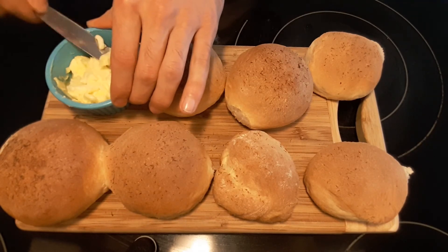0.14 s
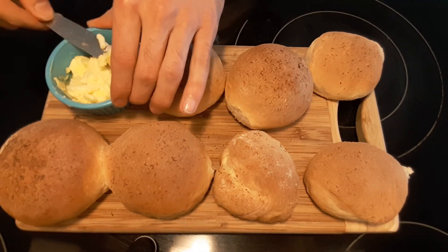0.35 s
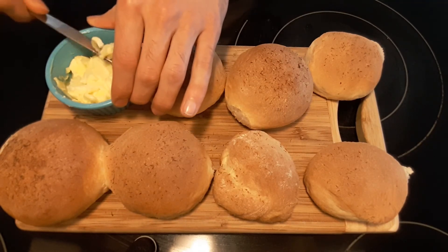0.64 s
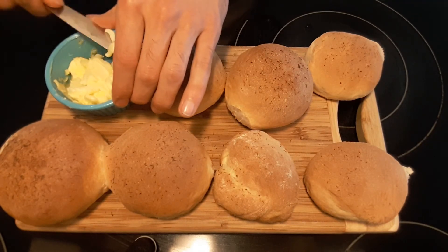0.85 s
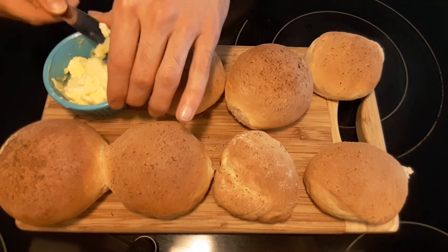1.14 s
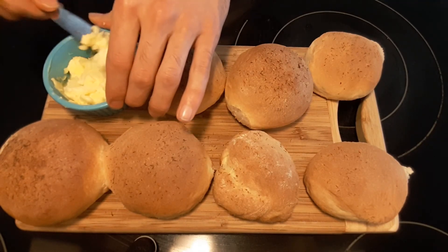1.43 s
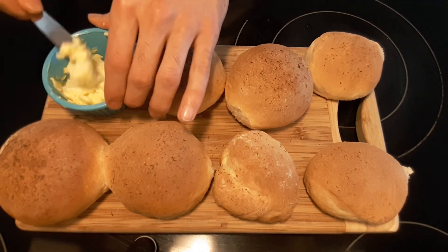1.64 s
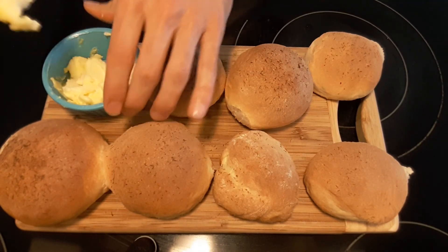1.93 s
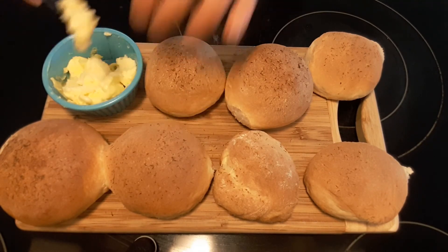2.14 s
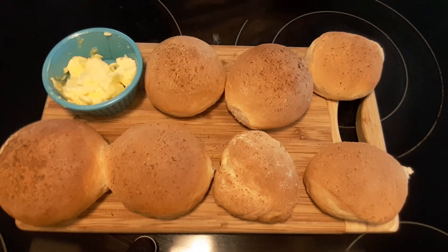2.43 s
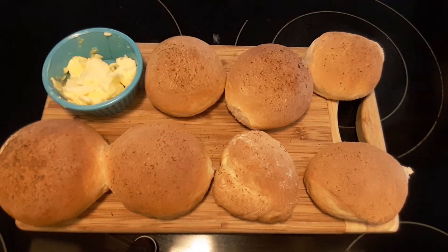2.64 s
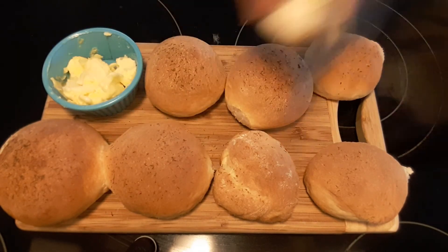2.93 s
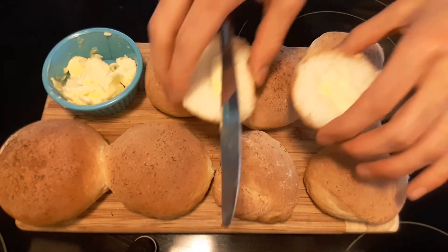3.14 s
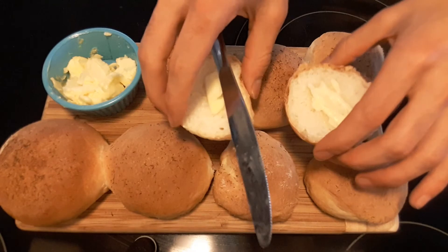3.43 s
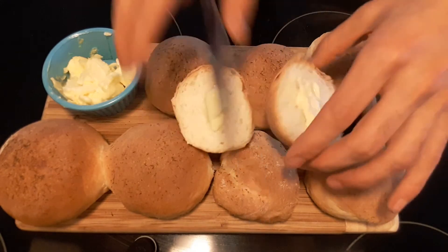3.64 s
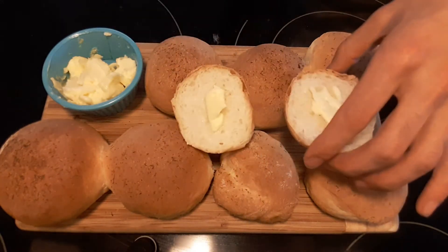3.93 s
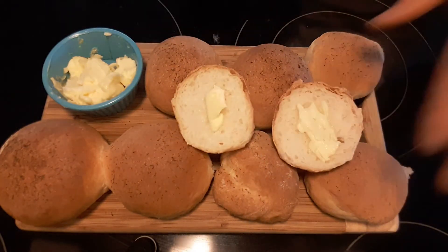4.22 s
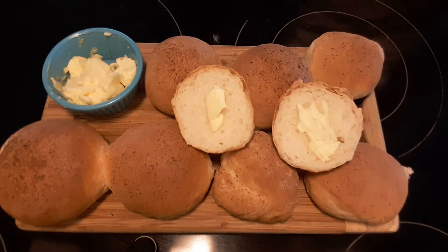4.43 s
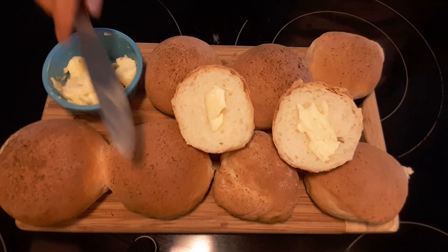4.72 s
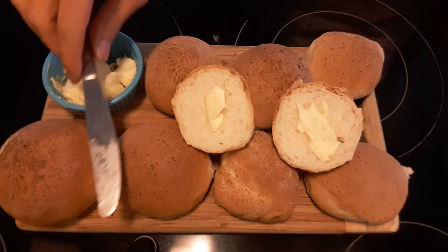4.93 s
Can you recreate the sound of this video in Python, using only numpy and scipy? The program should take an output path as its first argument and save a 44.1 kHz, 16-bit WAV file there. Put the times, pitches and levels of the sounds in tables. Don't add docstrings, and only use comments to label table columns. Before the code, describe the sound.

Dull low knocks and small taps of bread rolls and a butter knife on a wooden board, with faint rubbing, in a quiet kitchen.

```python
import sys
import numpy as np
from scipy import signal
from scipy.fft import rfft, irfft, next_fast_len
from scipy.io import wavfile
from scipy.ndimage import map_coordinates

SR = 44100
rng = np.random.default_rng(int(sys.argv[2]) if len(sys.argv) > 2 else 0)


def nominal_scale(level):
    x = np.asarray(level, float) / 20
    return 10 ** x


def log_audio(samples):
    frames = np.atleast_2d(samples).T
    limited = np.clip(frames, -1, 1)
    pcm = np.round(limited * 32767).astype(np.int16)
    wavfile.write(sys.argv[1], SR, pcm)


N = 224072
T = np.arange(SR // 2) / SR


def unit(x):
    return x / np.sqrt(np.mean(x ** 2) + 1e-20)


def along(points, hz):
    f, v = np.transpose(points)
    return np.interp(np.log(hz + 1), np.log(f + 1), v)


def wobble(rate):
    knots = rng.standard_normal(int(N * rate / SR) + 4)
    return map_coordinates(knots, [np.arange(N) * rate / SR])


def filtered(x, response):
    m = next_fast_len(N + SR // 2)
    hz = np.fft.rfftfreq(m, 1 / SR)
    return irfft(rfft(x, m) * response(hz), m)[:N]


def resonances(peaks):
    def response(f):
        total = 0
        for k, (hz, width, db) in enumerate(peaks):
            total = total + (-1) ** k * nominal_scale(db) * 1j * f * width / (hz * hz - f * f + 1j * f * width)
        return total
    return response


def noise(spectrum, lumpy_db=0, rate=100):
    grains = rng.standard_normal(N) * nominal_scale(lumpy_db * wobble(rate))
    return unit(filtered(grains, lambda hz: nominal_scale(along(spectrum, hz))))


def ring(modes, scatter_db, attack, count):
    hz, db, t60 = np.transpose(modes)[:, :, None]
    tones = nominal_scale(db - 60 * T / t60) * np.sin(2 * np.pi * hz * T) * (1 - np.exp(-T / attack))
    return nominal_scale(scatter_db * rng.standard_normal((count, len(modes)))) @ tones


def add(track, s, sound):
    track[round(s * SR):][:len(sound)] += sound


# start_s, peak level_db,
# pitch_hz, pressed_s, sag_per_s (negative: pitch rises)
PRESSES = [(0.0073, -28, 225, 0.0086, 8.8), (0.011, -30, 131, 0.021, 1), (0.019, -36, 317, 0.0046, 10),
           (0.027, -31, 300, 0.0048, 20), (0.0401, -40, 330, 0.0044, 1), (0.277, -53, 220, 0.027, 1),
           (0.3878, -51, 260, 0.0031, 5), (0.5496, -52.5, 420, 0.0047, 1), (0.648, -39, 262, 0.0078, 10),
           (0.665, -40, 217, .014, 1.1), (0.688, -40.5, 190, 0.005, 1), (0.707, -43.5, 195, .014, 1),
           (0.955, -38.5, 328, 0.004, 5), (0.9597, -35, 161, 0.016, 1), (0.966, -60, 603, 0.0084, 1),
           (1.067, -53.5, 264, 0.0058, 1), (1.1936, -44, 240, .005, 5), (2.656, -58, 904, 0.01, 1),
           (2.671, -53, 777, 0.017, 1), (2.684, -37.5, 144, 0.025, 3.3), (2.736, -47, 138, 0.024, 2.4),
           (2.775, -50, 125, 0.037, 1), (2.921, -58.5, 321, 0.023, 1), (4.249, -35.5, 189, 0.012, 1.1),
           (2.6505, -47, 550, 0.0045, 5.6), (2.6575, -49, 600, 0.0047, 5), (2.677, -39.5, 457, 0.0038, 5),
           (3.6576, -46, 423, 0.0056, 5), (3.6664, -36.5, 514, 0.0048, 5), (3.676, -42, 546, 0.0066, 6.1),
           (3.684, -33, 560, 0.0024, 5), (3.695, -27.5, 278, 0.015, 29), (3.718, -33, 199, 0.011, 1),
           (3.742, -33, 205, 0.0072, 12), (4.1605, -45, 378, 0.003, 5), (4.1661, -37, 189, 0.0061, 1.1),
           (4.1748, -34.5, 395, 0.0031, 5), (4.1775, -26, 199, 0.026, 4.3), (4.2345, -44, 550, 0.003, 1),
           (0.052, -43, 280, 0.0044, 1), (0.11, -53, 250, .008, 1), (0.972, -51, 480, 0.0037, 1),
         (2.69, -45, 36, .075, -1), (2.698, -39, 260, 0.0053, 3), (2.739, -46, 300, 0.0056, 1),
         (2.778, -47.5, 250, .007, 1), (3.664, -53, 1450, .012, 5), (4.166, -40.5, 112, 0.026, -0.5),
         (4.172, -50, 545, 0.0073, -1), (4.184, -47, 360, 0.01, -3), (4.206, -41, 290, 0.0047, 1),
         (4.215, -39.5, 205, .018, 2), (4.236, -52, 309, .007, 1), (4.271, -49, 204.5, 0.021, 3),
         (4.318, -60, 530, .009, 1), (4.352, -59, 400, 0.0087, 1), (4.775, -69, 582, .03, 0.5),
         (4.858, -57, 135, 0.024, 0), (4.86, -64, 270, .014, 1)]


def presses():
    out, t = np.zeros(N + SR), T[:SR // 10]
    for s, db, hz, pressed, sag in PRESSES:
        cycles = hz * (t - sag * np.minimum(t, 2 * pressed) ** 2 / 2)
        envelope = (1 - np.exp(-t / 0.0012)) * np.exp(-(t / pressed) ** 4)
        add(out, s, nominal_scale(db) * np.sin(2 * np.pi * cycles) * envelope)
    return out


# start_s, peak level_db, thud pitch_hz, ring_db, upper_db
LANDINGS = [(0.0072, -36.5, 210, 2.5, 3), (0.2589, -38, 179, -4.5, -18), (0.369, -39.5, 159.5, -5, -16),
            (0.548, -52, 304, -11, -7), (0.574, -50, 164, 5, -11), (0.6285, -29.5, 165, -11, -21),
            (0.794, -48.5, 164, -15, -17), (0.9456, -37, 192.6, -14, -11), (1.174, -38, 176, -8.5, -13),
            (1.259, -58.5, 154, 0, -1.5), (1.319, -57, 116, -4, -6), (1.57, -58.5, 208, 3, -7),
            (1.94, -48.5, 315, -3.5, -7.5), (2.6495, -31, 140, -22, -11.5), (2.668, -35.5, 165, -17, -14),
            (2.907, -53.5, 317, -24, -20), (3.407, -50, 289, 1.5, -29), (3.558, -51, 125, -19, -8.5),
            (3.657, -41, 336, 2, -2.5), (3.964, -57, 340, -6, -2), (4.16, -38, 140, -0.5, -4),
            (4.174, -43.5, 318, -5, -16), (4.235, -43, 213, -12, -7), (4.318, -56, 173, -14, -19)]
# start_s, peak level_db, thud pitch_hz, ring_db
ROCKS = [(0.017, -42, 137, 5), (0.0317, -39, 195, -7), (0.065, -38.5, 204, -4.5), (0.095, -40, 223, -17),
         (0.389, -52, 216, -6), (0.455, -57, 199, -14), (0.647, -44, 237, -4), (0.664, -44, 201, -9),
         (0.716, -49, 195, -27), (0.813, -46.5, 164, -5.5), (0.957, -45.5, 152, 1.5),
         (0.991, -47, 208, 5.5), (1.069, -56, 152, -20), (1.189, -48, 133, -25), (2.706, -39, 126, -11),
         (2.72, -39, 134, -18), (2.759, -47, 120, -13), (2.811, -48, 143, -8), (2.93, -52.5, 149, -25),
         (3.417, -45, 144, -23), (3.695, -42, 280, 3.5), (3.702, -32.5, 143, -10.5), (3.714, -45, 197, -25),
         (3.742, -54.5, 156, -23), (3.779, -43, 199, -20), (4.183, -51, 183, 10), (4.2, -38, 151, -1),
         (4.255, -38, 150, -23), (4.334, -39, 160, -22), (4.738, -63, 102, 0)]
# pitch_hz, level_db, t60_s
BOARD = [(102.1, -10.5, 0.4), (125.4, -6, 0.17), (142.3, 2, 0.24), (171, -8.5, 0.17), (189, -4.5, 0.23),
         (213.1, -1, 0.27)]
# pitch_hz, level_db, t60_s
UPPER = [(284.8, 4, 0.1), (313.4, 3, 0.14), (365.8, 0, 0.19), (432.5, 5.5, 0.038), (545, -2.5, 0.078),
         (618, -12.5, 0.11), (780, -10.5, 0.046), (932, -10.5, 0.082), (1098, -4.5, 0.03)]


def board():
    out, t = presses(), T[:SR // 10]
    contacts = [(*row, 0.013) for row in LANDINGS]
    for s, db, hz, ring_db in ROCKS:
        upper_db = -61.5 + 0.56 * (db + 36) - db
        contacts.append((s, db, hz, ring_db, upper_db, 0.014))
    lows = ring(BOARD, 3.0, attack=0.009, count=len(contacts))
    highs = ring(UPPER, 2.8, attack=0.0038, count=len(contacts))
    for (s, db, hz, ring_db, upper_db, push), low, high in zip(contacts, lows, highs):
        cycles = hz * (0.841 * t + 0.38 * 0.0068 * (1 - np.exp(-t / 0.0061)))
        envelope = (1 - np.exp(-t / 0.0032)) * np.exp(-(t / push) ** 2)
        add(out, s, nominal_scale(db + 1.5) * np.sin(2 * np.pi * cycles) * envelope)
        add(out, s, nominal_scale(db + ring_db - 6.5) * low + nominal_scale(db + upper_db - 4.0) * high)
    return filtered(out[:N], lambda f: (1j * f / (85 + 1j * f)) ** 2)


# start_s, peak level_db, contact colour_hz, rim_db, bright edge_db
TICKS = [(0.0049, -38.5, 1850, -13.5, -40), (0.0119, -48, 2240, -31.5, -35), (0.2559, -52, 1150, -29, -39),
         (0.552, -59, 800, -36, -30), (0.6256, -59, 900, -25, -30), (0.9435, -48, 1680, -28, -42),
         (1.172, -55, 1600, -26, -38), (1.9444, -62, 1770, -12, -25), (2.5014, -64, 895, -30, -30),
         (2.6496, -52.5, 1890, -26, -30), (3.4565, -64, 1660, -28, -2), (3.532, -56, 1420, -26, -24),
         (3.657, -41, 1570, -30, -32), (4.1592, -54.5, 795, -34, -25), (4.174, -48.5, 1310, -35.5, -10),
         (3.6657, -45, 1500, -30, -29), (3.6945, -50, 1300, -31, -29), (0.262, -59, 2100, -30, -30),
         (4.2054, -71, 1350, -25.5, -15.5), (4.2352, -46.5, 796, -42, -24), (4.32, -68, 1100, -28, -19)]
# pitch_hz, width_hz, level_db
RIM = [(3410, 210, 11), (5280, 350, -10)]


def blade():
    dull, rim, bright = np.zeros((3, N + SR))
    for s, db, hz, rim_db, bright_db in TICKS:
        click = nominal_scale(-60 * T[:1500] / 0.012) * rng.standard_normal(1500)
        click = click / np.linalg.norm(click)
        click[0] = 1.81
        click = nominal_scale(db) * click
        colour = signal.iirpeak(hz, 1.3, SR)
        add(dull, s, signal.lfilter(*colour, signal.lfilter(*colour, click)))
        add(rim, s, nominal_scale(rim_db) * click)
        add(bright, s, nominal_scale(bright_db) * click)
    contact_peak = resonances([(1500, 3500, 0.1)])
    edge_peaks = resonances([(6000, 1800, 1.5), (12900, 1800, 1.5)])
    contact = filtered(dull[:N], lambda f: contact_peak(f) ** 2)
    edge = filtered(bright[:N], lambda f: edge_peaks(f) * f / (f + 5000))
    return nominal_scale(18.5) * contact + nominal_scale(18.0) * filtered(rim[:N], resonances(RIM)) + nominal_scale(7.0) * edge


def strokes(rows):
    lower, upper = np.zeros((2, N + SR))
    attack = 0.0022
    for s, hold, db, upper_db, t60 in rows:
        released = np.maximum(T - attack - hold, 0)
        gain = np.minimum(T / attack, 1) * nominal_scale(db - 60 * released / t60)
        add(lower, s, gain)
        add(upper, s, nominal_scale(upper_db) * gain)
    return lower[:N], upper[:N]


# start_s, hold_s, level_db, rasp over body_db, release t60_s
RUBS = [(0.01, 0.0042, -57, -8, 0.026), (0.026, 0.066, -67, -16, 0.44), (0.549, .004, -58, -13, 0.15),
        (0.626, 0.081, -65.5, -6, 0.35), (0.943, .004, -52, -10, 0.043), (0.962, 0.04, -67, -7, 0.63),
        (2.585, 0.046, -68, -10, 0.09), (2.648, 0.0046, -46.5, -14, 0.1), (2.665, 0.04, -50.5, -11.5, 0.64),
        (2.913, 0.028, -73, -3, 0.11), (3.41, .006, -67.5, -3, .08), (3.449, 0.16, -68, -3.5, .1),
        (3.652, 0.028, -48, -6.5, 0.19), (3.666, 0.029, -45.5, -8, 0.089), (3.702, 0.048, -53, -1, 0.47),
        (3.944, 0.13, -73, -2, 0.26), (4.172, .004, -60.5, -4, 0.097), (4.183, 0.0033, -53, -17, 0.053),
        (4.194, 0.059, -63, -5, 0.72), (4.307, 0.11, -70.5, -9.5, 0.21), (4.726, 0.13, -64, -6.5, 0.19),
        (4.986, 0.024, -66, -12, .1), (5.047, 0.036, -82.5, 8, .1)]
# start_s, hold_s, level_db, fizz over rustle_db, release t60_s
CRACKLES = [(0.006, .006, -78.5, 5.5, 0.14), (0.545, .004, -84, -9, .1), (0.64, .04, -79.5, -8, 0.49),
            (0.947, 0.0044, -81, 0, 0.11), (2.583, .04, -85.5, 2, .1), (2.645, .008, -93, 1, .3),
            (2.665, 0.055, -88, -12, 0.89), (3.406, .01, -79, -3, 0.15), (3.444, 0.17, -91, 3, .1),
            (3.652, .014, -82.5, 11.5, 0.54), (3.658, 0.033, -74, -8, 0.4), (3.758, 0.32, -88.5, 1, 0.33),
            (4.16, 0.011, -81, -7, .1), (4.173, .003, -78, -1, 0.05), (4.199, 0.16, -86, 1, .5),
            (5.053, .03, -83, -1, .1)]
# pitch_hz, width_hz, level_db
BODY = [(321, 41, 2.5), (498, 72, -2), (571, 51, 0), (750, 107, -4), (884, 139, -7.5)]
# pitch_hz, density_db (per Hz)
RASP = [(600, -27.5), (950, -4), (1150, -4), (1350, -4), (1800, -9.5), (2300, -13), (3100, -16.5),
        (3700, -24), (6000, -120)]
# pitch_hz, density_db (per Hz)
RUSTLE = [(2000, -120), (3100, -16), (3500, -5), (4300, -6.5), (4900, -8), (5600, -26), (8000, -120)]
# pitch_hz, density_db (per Hz)
FIZZ = [(3500, -120), (5400, -22), (6300, 1), (7200, -6.5), (9000, -10), (12500, -10), (15500, -21)]


def rubbing():
    grains = rng.standard_normal(N) * nominal_scale(1.2 * wobble(250))
    body = unit(filtered(grains, resonances(BODY)))
    rasp = noise(RASP, lumpy_db=1.1, rate=540)
    rustle = noise(RUSTLE, lumpy_db=3.5, rate=240)
    fizz = noise(FIZZ, lumpy_db=2, rate=180)
    body_gain, rasp_gain = strokes(RUBS)
    rustle_gain, fizz_gain = strokes(CRACKLES)
    return nominal_scale(-5.5) * (body_gain * body + rasp_gain * rasp + rustle_gain * rustle + fizz_gain * fizz)


# start_s, hold_s, level_db, upper over lower_db, release t60_s
SLIDES = [
    (0.008, 0.0051, -62.5, -9, 0.052),
    (0.946, 0.0063, -68.5, -30, 0.036),
    (2.648, 0.022, -69.5, -3.5, 0.71),
    (3.655, 0.029, -65.5, -14.5, 0.7),
    (4.725, 0.08, -84, -11, 0.25),
]
# pitch_hz, density_db (per Hz)
SCUFF = [(900, -58), (1350, -1), (1700, 3.5), (2150, 2.5), (2600, -14), (4000, -90)]
# pitch_hz, density_db (per Hz)
SCRATCH = [(1500, -62), (2100, -3), (2600, 5), (3100, -4), (3700, -15), (5000, -36)]


def sliding():
    lower, upper = strokes(SLIDES)
    return lower * noise(SCUFF, lumpy_db=2.0) + upper * noise(SCRATCH, lumpy_db=0.5)


# centre_s, level_db, length_s
LEANS = [(0.163, -66, 0.033), (0.402, -64, 0.045), (0.63, -58.5, 0.088), (0.818, -61, 0.024),
         (1.203, -71, .08), (1.987, -68, 0.033), (2.098, -71.5, .04), (2.739, -53.5, 0.1),
         (2.996, -70, 0.098), (3.748, -46, 0.046), (3.864, -67, 0.082), (3.666, -60, .03), (2.6, -65, .04),
         (4.093, -73, 0.05), (4.265, -56, 0.095), (4.4, -65, .08), (0.1, -61, 0.052), (4.757, -64, .04),
         (4.88, -76, 0.026), (5.05, -81, .05)]
# time_s, murmur level_db
BUSY = [(0, -63), (.17, -57), (.6, -59.5), (1.2, -60), (1.4, -72), (1.54, -61.5), (1.85, -75), (2.08, -60),
        (2.33, -77.5), (2.66, -74), (2.76, -55), (3.1, -71), (3.3, -87), (3.71, -70), (4.15, -76),
        (4.25, -55.5), (4.6, -63.5), (5.08, -75.5)]


def hands():
    t = np.arange(N) / SR
    weight = nominal_scale(-82.5)
    for s, db, length in LEANS:
        weight = weight + nominal_scale(db) * np.exp(-((t - s) / length) ** 2)
    busy_s, busy_db = np.transpose(BUSY)
    murmur_db = np.interp(t, busy_s, busy_db, left=-150, right=-150)
    rumble = noise([(20, -26.5), (40, -11.0), (70, -1.0), (100, -2.0), (140, -37.5), (300, -94)],
                   lumpy_db=3.5, rate=13)
    murmur = noise([(50, -47.5), (100, -3.5), (140, -3.5), (215, -11), (300, -10.5), (500, -48.5)],
                   lumpy_db=3.0, rate=19)
    return nominal_scale(-4) * weight * rumble + nominal_scale(murmur_db - 7.5) * murmur


# pitch_hz, t60_s
KITCHEN = [(150, 0.18), (1000, 0.47), (3000, 0.55), (10000, 0.098)]


def kitchen(x):
    hz, t, z = signal.stft(rng.standard_normal(SR // 2), SR, nperseg=256)
    decay = nominal_scale(-60 * t / along(KITCHEN, hz)[:, None])
    tail = signal.istft(z * decay, SR, nperseg=256)[1]
    return signal.fftconvolve(np.pad(x, (300, 0)), tail / np.linalg.norm(tail))[:N]


# pitch_hz, density_db (per Hz)
AIR = [(20, -16.5), (45, -16.5), (85, -7), (135, -1.5), (230, -7.5), (400, -10.5), (1000, -19.5),
       (2000, -25.5), (3200, -31.5), (5200, -39), (6500, -37.5), (7600, -41.5), (13000, -41.5),
       (15000, -38.5)]


def air():
    return nominal_scale(-68 + 0.3 * wobble(1.5) + 0.4 * wobble(8.8)) * noise(AIR)


# pitch_hz, density_db (per Hz)
SPREAD = [(12, -45), (20, -31), (44, -14), (109, -6.5), (225, -4), (289, -6.5), (393, -4), (564, -7.5),
          (881, -10), (1010, -11.5), (2270, -18.5), (2470, -19), (5090, -29.5), (15500, -31.5)]


def scene():
    knocks, ticks = board(), blade()
    room = kitchen(nominal_scale(-10.5) * knocks + nominal_scale(-14.0) * ticks)
    mid = knocks + ticks + rubbing() + sliding() + hands() + room + air()
    side = nominal_scale(-79.5) * noise(SPREAD)
    return np.array([mid + side, mid - side])


def band_limit(x):
    return signal.sosfilt(signal.butter(12, 15640, fs=SR, output="sos"), x)


def record(dry):
    mix = dry - 0.0005
    return band_limit(mix)


dry = scene()
out = record(dry)
log_audio(out)
```